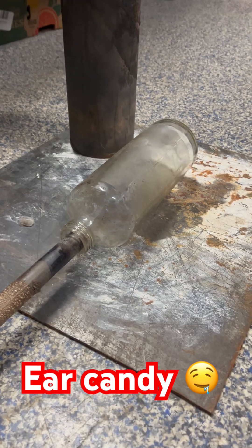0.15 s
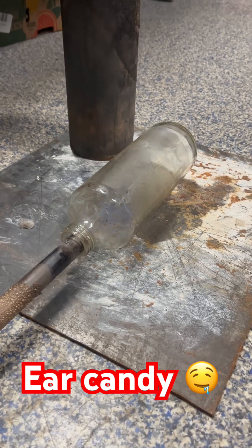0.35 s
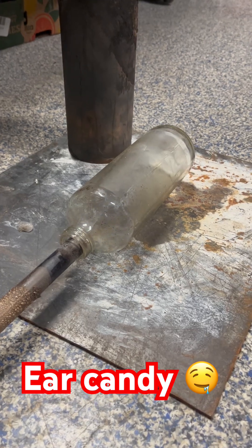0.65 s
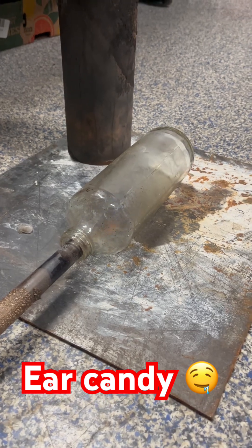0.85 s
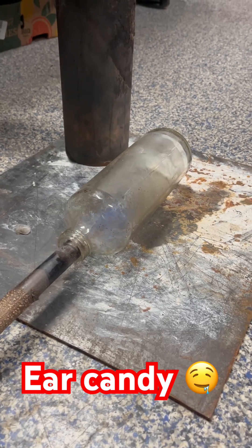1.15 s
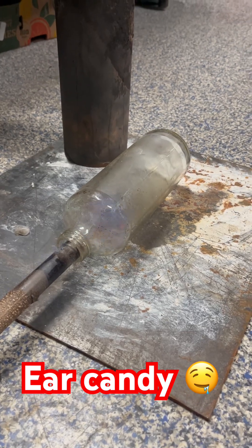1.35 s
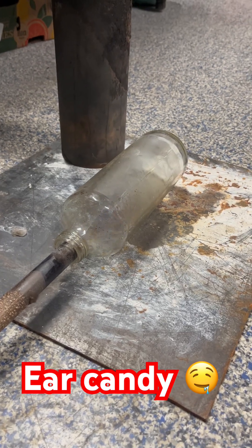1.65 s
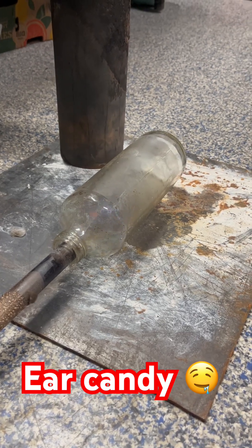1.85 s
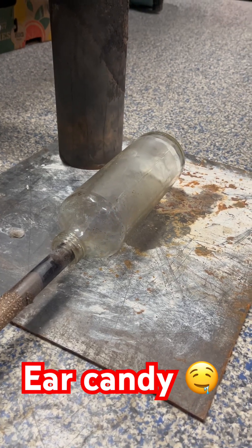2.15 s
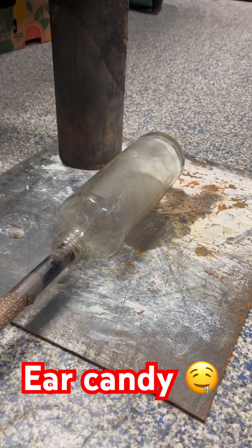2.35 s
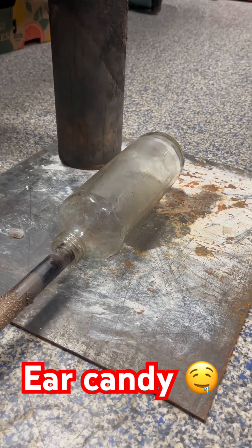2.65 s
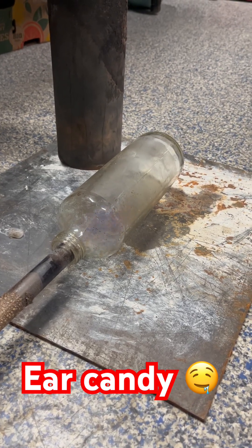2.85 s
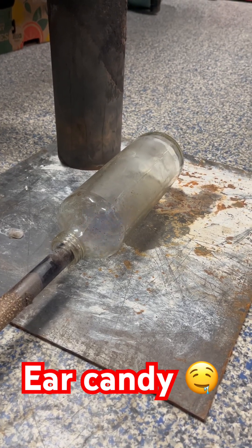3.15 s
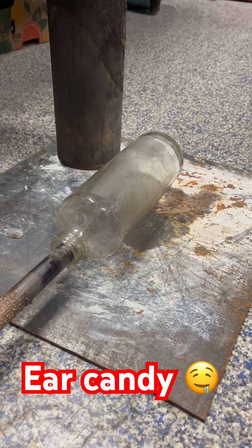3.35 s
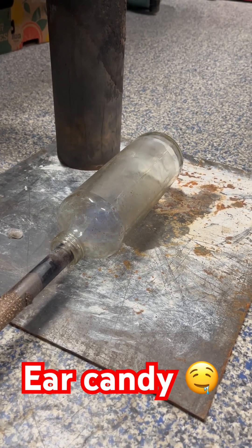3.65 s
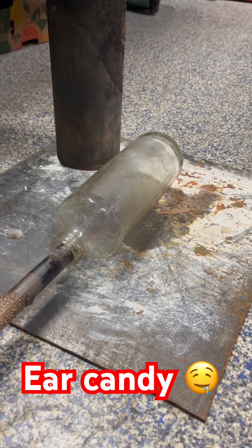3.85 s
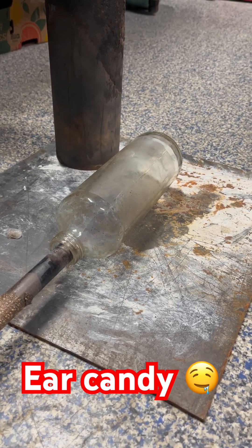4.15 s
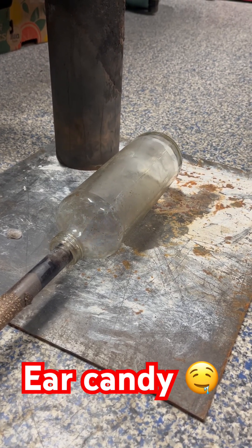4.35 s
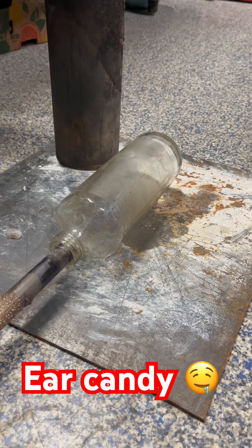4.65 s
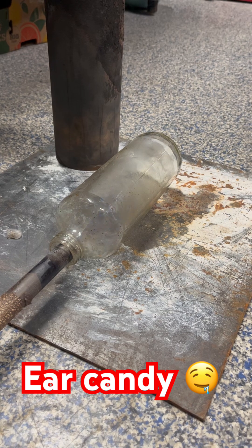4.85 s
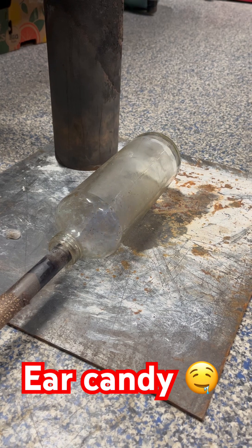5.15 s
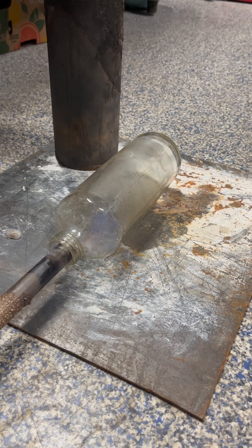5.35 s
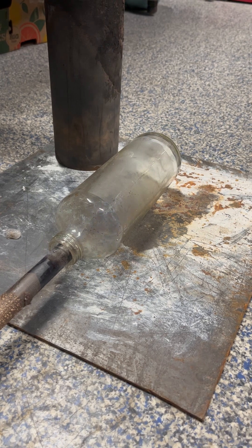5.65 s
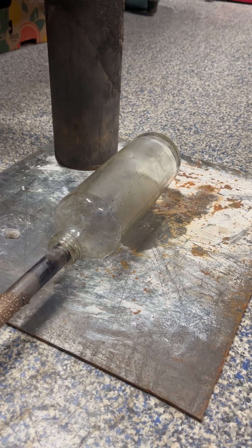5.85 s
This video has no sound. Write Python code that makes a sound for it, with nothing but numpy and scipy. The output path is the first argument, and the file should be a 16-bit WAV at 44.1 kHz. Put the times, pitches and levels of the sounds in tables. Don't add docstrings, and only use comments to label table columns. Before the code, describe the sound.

A homemade pulse jet, a glass bottle with a pipe in its neck on a steel plate, is already sputtering at the start and continues to the end at six seconds. Firings come irregularly, roughly thirty a second with weak beats between strong ones. Each begins with a short crackling spit of gas and a duller puff, followed about a hundredth of a second later by a deep thump sliding down in pitch. Hollow pipe tones boom on, pops snap at the mouth, and the glass rings thin and high. From 0 to 1.8 s it is hottest, with hard bright blasts near 0.2, 0.4 and 1.3 s. From 1.8 to 3.9 s it is leaner and duller, picking up after 3. It nearly dies around 4 s, revives, and thumps densely from 4.6 to 5.6 s before thinning. Close phone microphone, short hard-walled echo, lightly limited peaks.

```python
import sys
import numpy as np
from scipy import signal
from scipy.fft import rfft, irfft, next_fast_len
from scipy.io import wavfile
from scipy.ndimage import map_coordinates

SR = 44100
rng = np.random.default_rng(int(sys.argv[2]) if len(sys.argv) > 2 else 0)


def volts(x):
    e = np.asarray(x, float) / 20
    return 10 ** e


def to_wav(sig):
    pcm = np.clip(np.atleast_2d(sig), -1, 1) * 32767
    pcm = np.round(pcm).astype(np.int16)
    wavfile.write(sys.argv[1], SR, pcm.T)


N = 264159


def unit(x):
    return x / np.sqrt(np.mean(x ** 2) + 1e-20)


def along(points, hz):
    point_hz, value = np.transpose(points)
    return np.interp(np.log(hz + 1), np.log(point_hz + 1), value)


def filtered(x, response):
    size = next_fast_len(N + SR // 2)
    spectrum = rfft(x, size) * response(np.fft.rfftfreq(size, 1 / SR))
    return irfft(spectrum, size)[..., :N]


def modes(table):
    def response(f):
        return sum(volts(db) * 1j * f * width / (hz * hz - f * f + 1j * f * width) for hz, width, db in table)
    return response


def noise(response):
    return unit(filtered(rng.standard_normal((2, N)), response))


def coloured(table):
    return noise(lambda f: volts(along(table, f)))


def wobble(rate):
    points = rng.standard_normal(int(N * rate / SR) + 4)
    return map_coordinates(points, [np.arange(N) * rate / SR])


def clock_ms(half):
    return np.arange(-half, half) * 1000 / SR


def placed(times, shapes):
    length = shapes.shape[1]
    half = length // 2
    at = np.round(times * SR).astype(int)[:, None] + np.arange(length)
    faded = shapes * signal.windows.tukey(length, .5)
    return np.bincount(at.ravel(), faded.ravel(), N + 2 * SR)[half:half + N]


def swell(ms, rise_ms, fall_ms):
    return 2 / (np.exp(np.minimum(-ms / rise_ms, 50)) + np.exp(np.minimum(ms / fall_ms, 50)))


# start_s, spit_db, thump_db
HOT_RUN = [(0.058, -33.5, -9), (0.13, -29.5, -13), (0.167, -33, -12), (0.202, -20.5, -0.5),
           (0.25, -38.5, -6.5), (0.328, -31, -6.5), (0.415, -19.5, -2.5), (0.469, -25, -5.5),
           (0.491, -27, -22.5), (0.509, -27, -9.5), (0.536, -23.5, -6), (0.556, -26.5, -3),
           (0.741, -29.5, -5.5), (0.91, -29.5, -7.5), (0.969, -30.5, -6), (1.026, -37.5, -12.5),
           (1.094, -34, -6), (1.183, -21.5, -5), (1.213, -39, -22.5), (1.236, -25.5, -7), (1.285, -18, -1),
           (1.324, -29.5, -4.5), (1.381, -24, -4), (1.404, -25.5, -6.5), (1.429, -34.5, -7.5),
           (1.536, -40.5, -18.5), (1.575, -35, -14.5), (1.601, -33, -6), (1.667, -27, -5.5),
           (1.731, -34.5, -5.5)]
# start_s, spit_db, thump_db
LEAN_RUN = [(1.829, -34.5, -26.5), (1.874, -36.5, -10), (1.911, -31.5, -5.5), (1.982, -32.5, -9.5),
            (2.018, -29, -10.5), (2.07, -31, -11), (2.165, -43, -8), (2.252, -40.5, -16.5),
            (2.299, -39, -11), (2.37, -31, -19.5), (2.405, -38, -8), (2.484, -34.5, -10.5),
            (2.583, -40.5, -12), (2.699, -33.5, -14), (2.852, -35, -13), (2.96, -31.5, -16),
            (3.017, -31, -5), (3.092, -37.5, -7.5), (3.193, -26.5, -8.5), (3.221, -28, -8),
            (3.278, -36, -8), (3.343, -29, -6.5), (3.409, -34.5, -11), (3.431, -32, -6.5),
            (3.46, -29.5, -2.5), (3.577, -37, -9), (3.688, -40.5, -9.5), (3.756, -38, -14.5),
            (3.797, -29.5, -8.5), (3.865, -31, -9.5)]
# start_s, spit_db, thump_db
REVIVED_RUN = [(4.126, -38.5, -7), (4.154, -36.5, -10), (4.222, -39.5, -10), (4.264, -28.5, -5.5),
               (4.347, -37.5, -17), (4.422, -41, -11.5), (4.5, -30, -9.5), (4.552, -38, -17.5),
               (4.64, -33, -5.5), (4.705, -26.5, -4.5), (4.734, -30, -5), (4.785, -27.5, -5.5),
               (4.85, -32, -10), (4.872, -30.5, -25.5), (4.903, -30, -7), (4.924, -32.5, -5),
               (4.977, -33.5, -13), (5.009, -27.5, -8.5), (5.09, -35.5, -5), (5.149, -28, -5),
               (5.179, -30, -6), (5.209, -34, -6.5), (5.333, -32.5, -6.5), (5.385, -36, -14.5),
               (5.481, -32, -13), (5.553, -34.5, -7.5), (5.583, -33, -8.5), (5.612, -25, -5),
               (5.771, -31.5, -10.5), (5.932, -35, -12.5)]


def firings():
    strong = np.array(HOT_RUN + LEAN_RUN + REVIVED_RUN)
    edges = np.r_[0, strong[:, 0], N / SR + .01]
    waits = np.diff(edges)
    refill_s = .033
    beats = np.maximum(np.round(waits / refill_s), 1).astype(int)
    s = np.concatenate([a + w * np.arange(1, b) / b for a, w, b in zip(edges, waits, beats)])
    after = np.searchsorted(edges, s)
    away_s = np.minimum(s - edges[after - 1], 2.28 * (edges[after] - s))
    chance = rng.standard_normal((400, 4))
    jitter, spit, thump = chance[:len(s), 1:].T
    spit_db = -39 - 172 * away_s + 4.5 * spit
    thump_db = -10.5 - 62.5 * away_s + 3 * thump
    rows = np.r_[strong, np.c_[s + .002 * jitter, spit_db, thump_db]]
    lag_ms = 11.05 * np.exp(.22 * chance[:len(rows), 0])
    return np.c_[rows, lag_ms]


def hiss():
    return volts(-90.5) * noise(lambda f: 1 / (1 + (f / 9500) ** 12))


# pitch_hz, time_s
ECHO_TIME = [(100, 0.72), (500, 0.45), (3000, 0.4), (8000, 0.21), (13000, 0.15), (14500, 0.14)]


def walls(x):
    hz, t, z = signal.stft(rng.standard_normal((2, SR // 2)), SR, nperseg=256)
    fade = volts(-60 * t / along(ECHO_TIME, hz)[:, None])
    tail = signal.istft(z * fade, SR, nperseg=256)[1]
    late = np.pad(x, ((0, 0), (300, 0)))
    return signal.fftconvolve(late, tail / np.linalg.norm(tail[0]), axes=1)[:, :N]


# pitch_hz, level_db
ROAR_COLOUR = [(15, -42.5), (35, -7), (60, 3), (150, -2), (230, -3.5), (300, -7), (345, -32.5), (400, -31),
               (600, -67.5)]
# start_s, level_db
BURNING = [(0.0, -15.5), (0.4, -17.5), (0.7, -23.5), (0.98, -20.5), (1.12, -18.5), (1.28, -10.5),
           (1.67, -24.5), (2.78, -27.5), (3.23, -20.5), (3.7, -24), (3.92, -22), (4.14, -30.5), (4.62, -24),
           (4.84, -13), (5.14, -15), (5.32, -17.5), (5.86, -24), (5.99, -25.5)]


def boom():
    burning_db = np.interp(np.arange(N) / SR, *np.transpose(BURNING))
    lowest = modes(PIPE_TONES[:1])
    roar = noise(lambda f: volts(along(ROAR_COLOUR, f)) * (1 + 0.97 * lowest(f)))
    return volts(burning_db - 5.5 + 3.7 * wobble(25)) * roar


def glass_tone(fired):
    ms = clock_ms(4000)
    flare_db = -51 + 0.79 * (fired[:, 1] + 28) + 4 * rng.standard_normal(len(fired))
    flares = placed(fired[:, 0], volts(flare_db)[:, None] * swell(ms - 8, rise_ms=4.4, fall_ms=20))
    pitch_hz = 1449 + 18 * wobble(2.7) + 24 * wobble(90)
    strength = volts(-63.5 + 3 * wobble(6.9)) + flares
    flutter = volts(4.5 * wobble(55))
    tone = np.sin(2 * np.pi * np.cumsum(pitch_hz) / SR)
    return strength * flutter * tone * [[1], [0]]


# pitch_hz, width_hz, level_db
PIPE_TONES = [
    (176.64, 27, -1),
    (213.9, 46.3, -4.5),
    (279.6, 62.3, -3.5),
]


def pipe(fired):
    s, _, thump_db, _ = fired.T
    ms = clock_ms(3500)
    rings = 0
    for hz, width, db in PIPE_TONES:
        chance = rng.standard_normal((len(s), 3))
        size = volts(thump_db[:, None] + db - 8.0 + 2 * chance[:, :1])
        pitch_hz = hz * np.exp(0.026 * chance[:, 1:2])
        cycles = np.sin(2 * np.pi * (pitch_hz * ms / 1000 + chance[:, 2:]))
        hump = swell(ms - 4, rise_ms=2.8, fall_ms=1000 / (np.pi * width))
        rings = rings + size * hump * cycles
    return placed(s, rings)


def thumps(fired):
    s, _, thump_db, lag_ms = fired.T
    ms = clock_ms(2000)
    vary = np.exp(0.12 * rng.standard_normal((len(s), 2)))
    high_hz, low_hz = 200 * vary[:, :1], 55 * vary[:, 1:]
    pitch_hz = low_hz + (high_hz - low_hz) / (1 + np.exp((ms - .2) / 2.2))
    turns = np.cumsum(pitch_hz, axis=1) / SR
    cycles = -np.cos(2 * np.pi * (turns - turns[:, 2000:2001]))
    wave = volts(thump_db - 2.5)[:, None] * cycles * swell(ms + .8, rise_ms=5, fall_ms=9)
    wave = placed(s + lag_ms / 1000, wave)
    return filtered(wave, lambda f: f ** 2 / (f ** 2 + 38 ** 2))


# start_s, level_db, pitch_hz
LOUD_BACKFIRES = [(0.413, -14.5, 474), (0.47, -18, 476), (0.531, -22, 515), (0.965, -18.5, 550),
                  (1.09, -22, 580), (1.283, -8.5, 505), (1.321, -15, 664), (1.426, -19.5, 450),
                  (1.727, -21.5, 423), (1.975, -22, 490), (2.068, -26, 467), (2.474, -24, 440),
                  (2.696, -22.5, 432), (3.015, -19.5, 455), (3.339, -20, 467), (3.522, -20.5, 531),
                  (3.862, -19, 450), (4.12, -25.5, 720), (4.149, -23.5, 670), (4.261, -16.5, 517),
                  (4.348, -24.5, 514), (4.492, -18, 506), (4.732, -20, 714), (4.946, -16.5, 495),
                  (5.146, -23.5, 450), (5.482, -24, 680), (5.771, -20.5, 570), (5.93, -19.5, 577)]


def backfires():
    at, spit_db, _ = np.transpose(HOT_RUN + LEAN_RUN + REVIVED_RUN)
    chance = rng.standard_normal((len(at), 2))
    small_db = -29.5 + 0.43 * (spit_db - spit_db.mean()) + 3.5 * chance[:, 0]
    small_hz = 490 * np.exp(.09 * chance[:, 1])
    small = np.c_[at - .002, small_db, small_hz]
    at, pop_db, pop_hz = np.r_[LOUD_BACKFIRES, small].T
    ms = clock_ms(1500)
    cycles = np.sin(2 * np.pi * (pop_hz[:, None] * ms / 1000 + rng.random((len(at), 1))))
    pops = volts(pop_db - 2.5)[:, None] * swell(ms, rise_ms=1.36, fall_ms=2.15) * cycles
    return placed(at + 0.003315, pops) * [[1], [.5]]


# pitch_hz, level_db
SPIT_COLOUR = [(700, 3.5), (1500, -3.5), (2500, -1.5), (4800, -2.5), (6000, -16), (7500, -39),
               (16000, -62.5)]
# pitch_hz, level_db
PUFF_COLOUR = [(150, -5), (280, 4), (340, -11.5), (420, 6.5), (750, -2), (1000, -7), (1600, -8),
               (2500, -89.5)]
# pitch_hz, level_db
SIZZLE_COLOUR = [(3500, -18.5), (5500, 0.5), (7000, -1), (9000, -3), (12000, -6), (13600, -12.5),
                 (14300, -2.5), (15500, -15.5), (15900, -23), (17000, -76.5)]
# pitch_hz, width_hz, level_db
GLASS_TONES = [
    (1450, 42, 10),
    (1535, 170, 0.5),
    (2270, 53, -10.5),
    (3042, 170, 0.5),
    (4700, 230, -10),
]


def jet(fired):
    s, spit_db, _, _ = fired.T
    puff_db = .62 * spit_db - 8
    ms = clock_ms(1500)
    stretch = np.exp(0.12 * rng.standard_normal((len(s), 1)))
    half_ms = stretch * np.clip(2.5 + .04 * (spit_db[:, None] + 26.5), 1.5, 6)
    opening = swell(ms + half_ms + 0.73, rise_ms=0.94, fall_ms=6.63)
    blast = opening * swell(ms - half_ms, rise_ms=9.0, fall_ms=4.3)
    spit = placed(s, volts(spit_db - 6.0)[:, None] * blast)
    puff = placed(s, volts(puff_db)[:, None] * swell(ms / stretch - .6, rise_ms=1.65, fall_ms=3.41))
    early = blast * swell(ms + half_ms, rise_ms=5.4, fall_ms=5.6)
    sizzle = placed(s, volts(1.4 * spit_db - 5)[:, None] * early)
    crackle = volts(2.8 * wobble(900) + 1.42 * wobble(350))
    spit = spit * unit(crackle * coloured(SPIT_COLOUR))
    glass = modes(GLASS_TONES)
    spit = filtered(spit, lambda f: 1 + glass(f))
    sizzle = sizzle * unit(crackle * coloured(SIZZLE_COLOUR))
    return spit + sizzle + puff * coloured(PUFF_COLOUR)


# pitch_hz, likeness
PORT_LIKENESS = [(100, .9995), (400, .985), (800, .9), (1400, .92), (2300, .68), (3500, .2), (4700, .55),
                 (5800, .985), (7200, .85), (8200, .96), (10200, .985), (15000, .95)]
# pitch_hz, phase_rad
LEFT_LEAD = [(0, 0), (330, -.55), (450, -.95), (850, -1.2), (1000, -.4), (1550, -.8), (1950, .9),
             (2400, 1.4), (2750, 3.3), (5000, 6.3), (5950, 9.4), (7300, 12), (8300, 12.7), (16000, 24.1)]
# pitch_hz, level_db
LEFT_TILT = [(50, -.2), (160, -.6), (330, -1.8), (900, -6), (1300, -3), (1600, -4.5), (2200, 0), (2600, -2),
             (2850, 4), (3200, -6), (3800, -8), (4700, -7), (5400, .3), (15000, -.4)]


def ports(pair):
    def split(f):
        angle = np.arccos(np.clip(along(PORT_LIKENESS, f), -1, 1)) / 2
        return np.array([np.cos(angle), np.sin(angle)])

    def place(f):
        lead = np.interp(f, *np.transpose(LEFT_LEAD))
        return volts(along(LEFT_TILT, f) * [[1], [0]]) * np.exp(.5j * lead * [[1], [-1]])

    shared, own = filtered(pair, split)
    return filtered(np.array([shared + own, shared - own]), place)


def scene():
    fired = firings()
    gas = jet(fired) + backfires()
    thump = thumps(fired) + pipe(fired)
    pair = boom() + glass_tone(fired) + gas + thump * [[1], [0]]
    pair = pair + volts(-13) * walls(gas) + volts(-14.5) * walls(np.array([thump, thump]))
    pair = pair * np.minimum(np.arange(N, 0, -1) / 150, 1)
    return ports(pair) + hiss()


def low_pass(x):
    return signal.sosfilt(signal.butter(12, 15850, fs=SR, output="sos"), x)


def record(dry):
    limited = dry / (1 + np.abs(dry / 1.03) ** 5) ** (1 / 5)
    return low_pass(limited)


dry = scene()
out = record(dry)
to_wav(out)
```